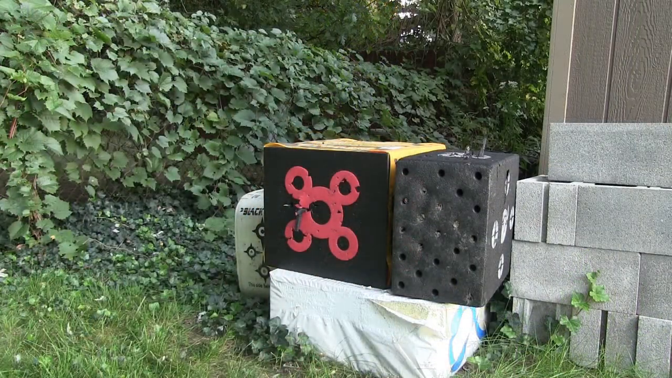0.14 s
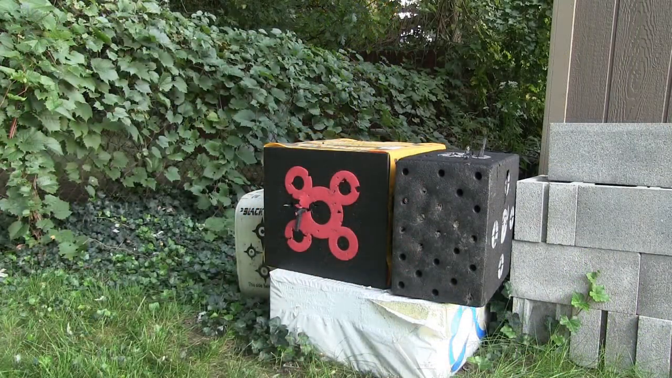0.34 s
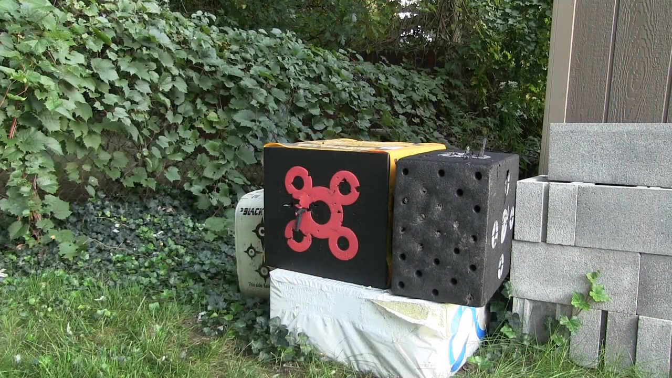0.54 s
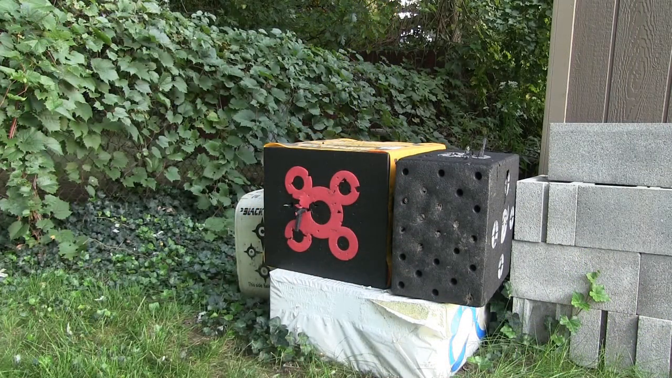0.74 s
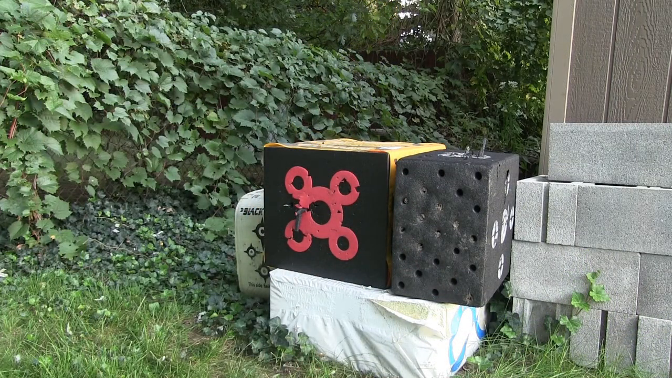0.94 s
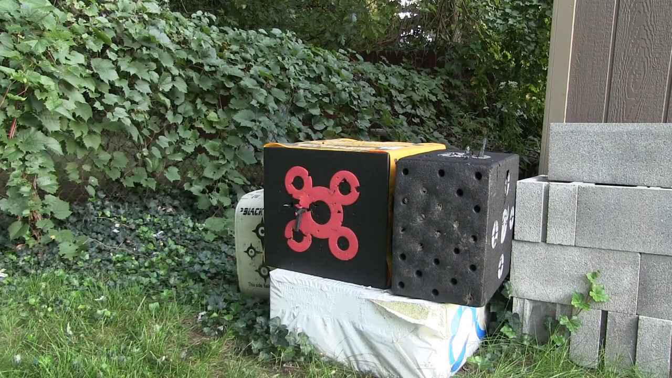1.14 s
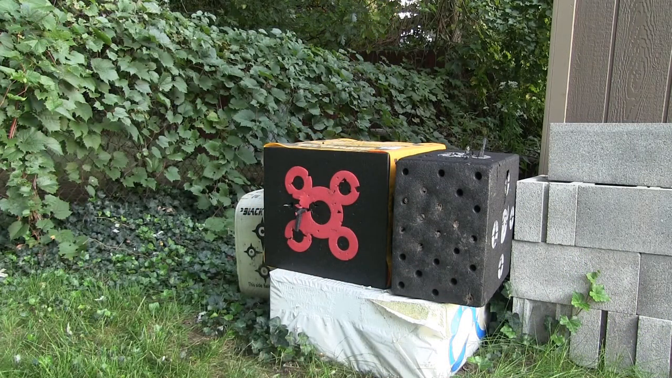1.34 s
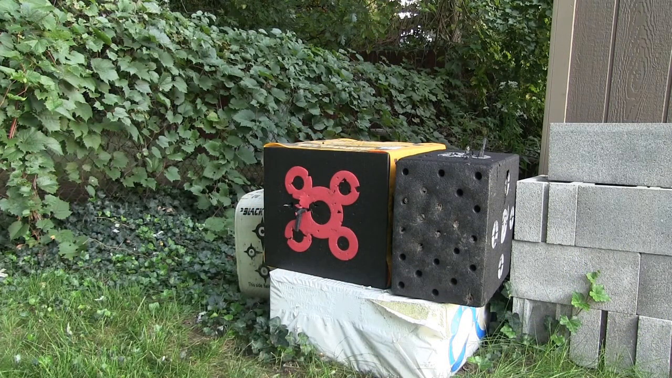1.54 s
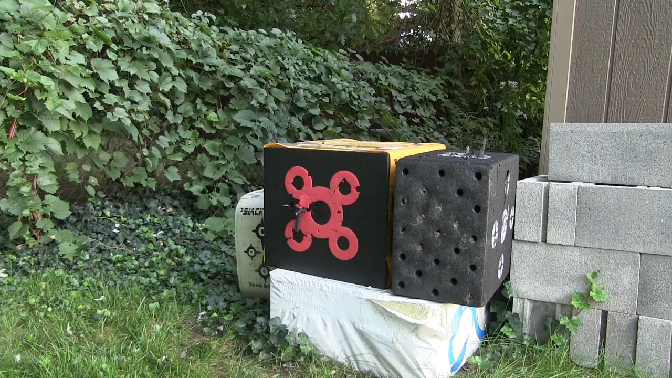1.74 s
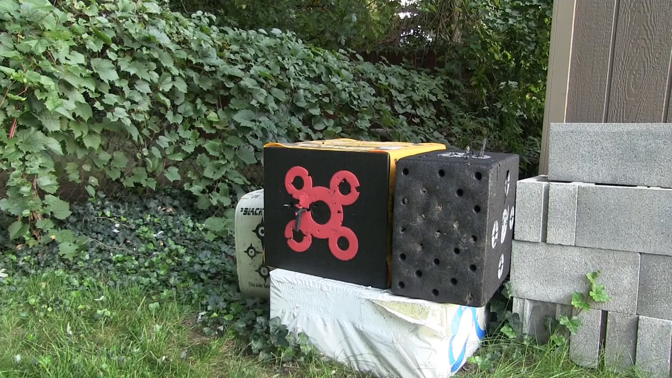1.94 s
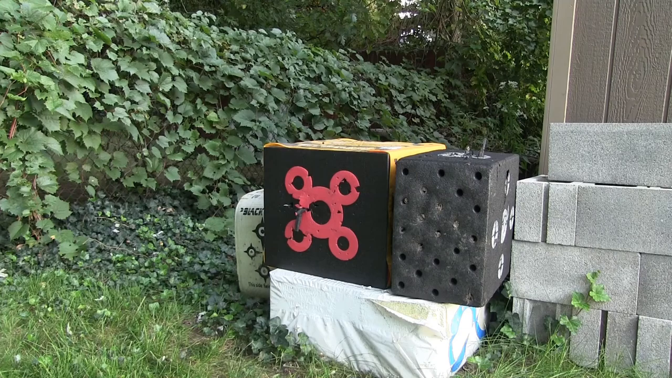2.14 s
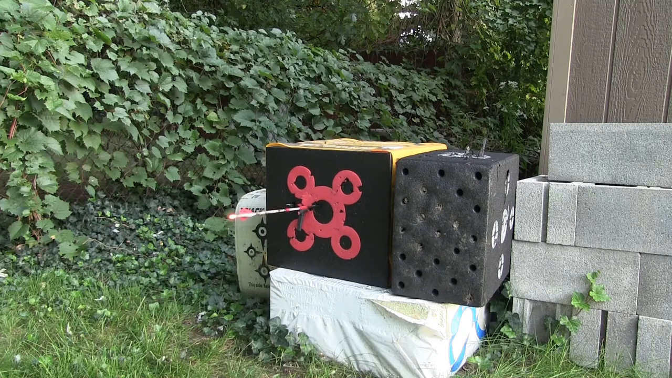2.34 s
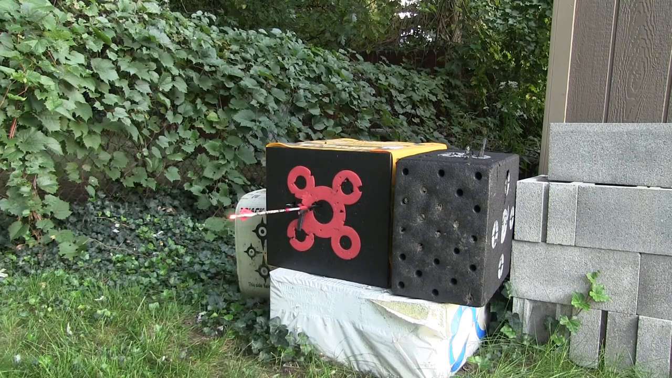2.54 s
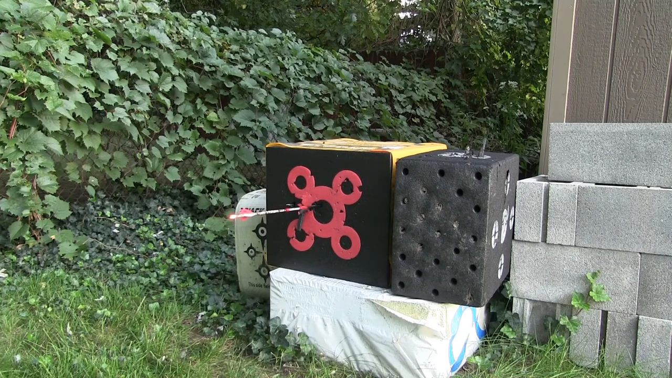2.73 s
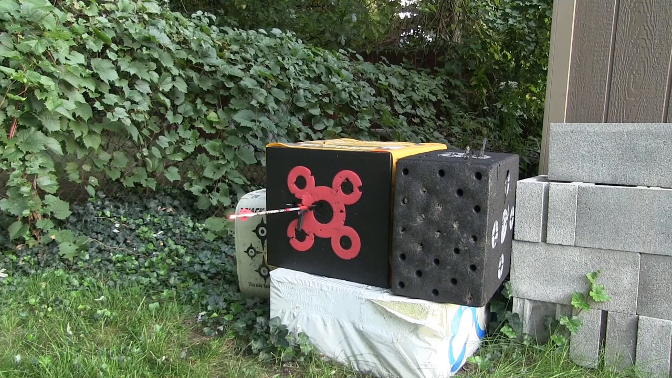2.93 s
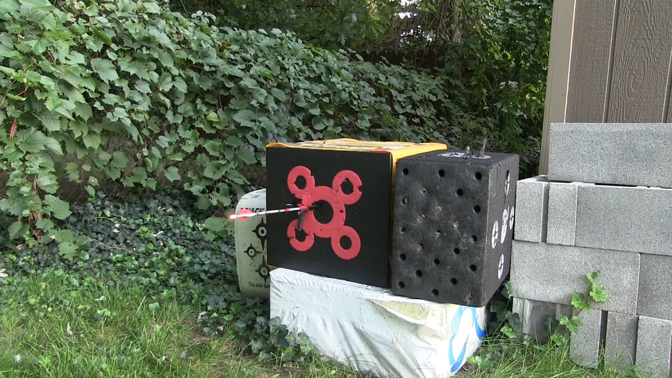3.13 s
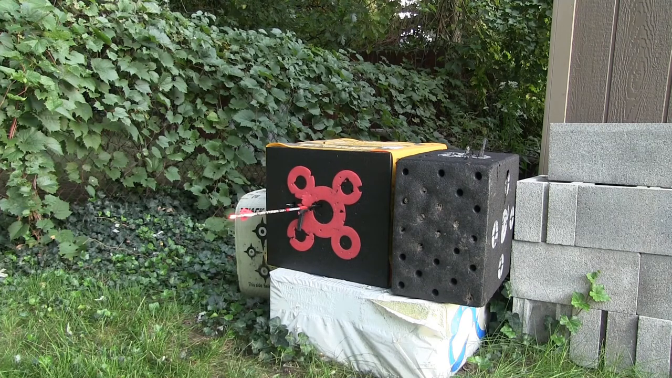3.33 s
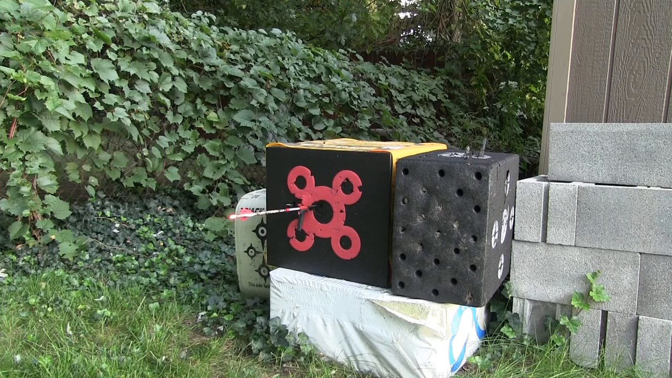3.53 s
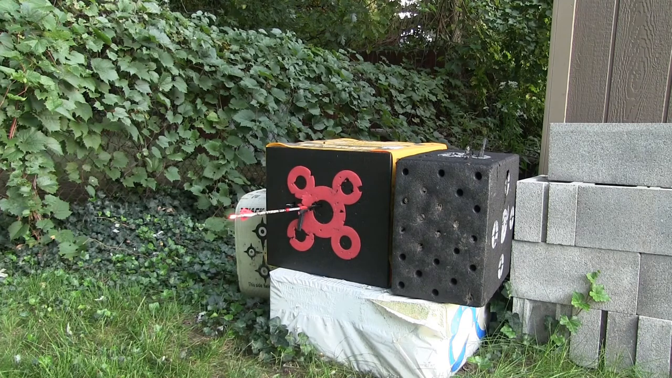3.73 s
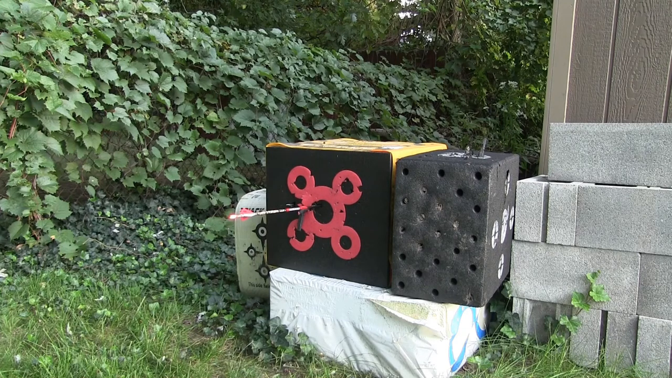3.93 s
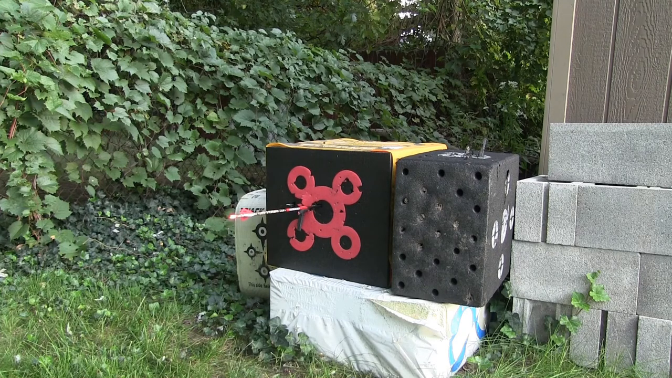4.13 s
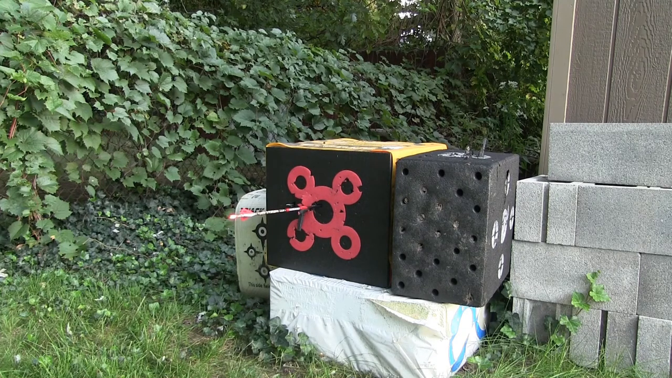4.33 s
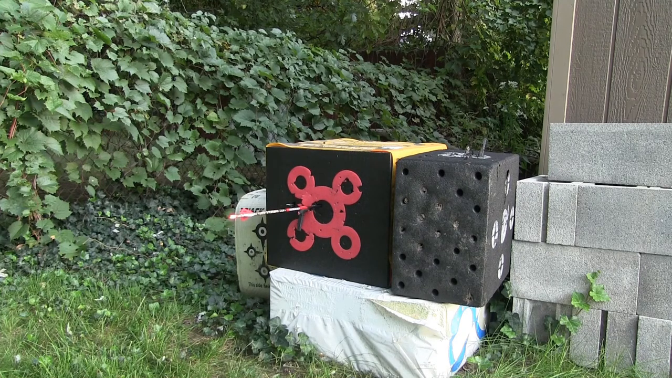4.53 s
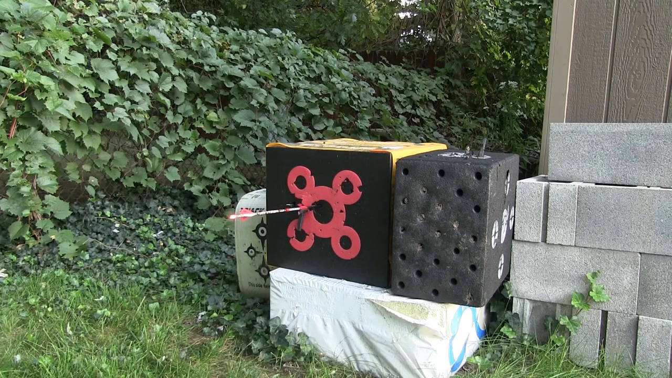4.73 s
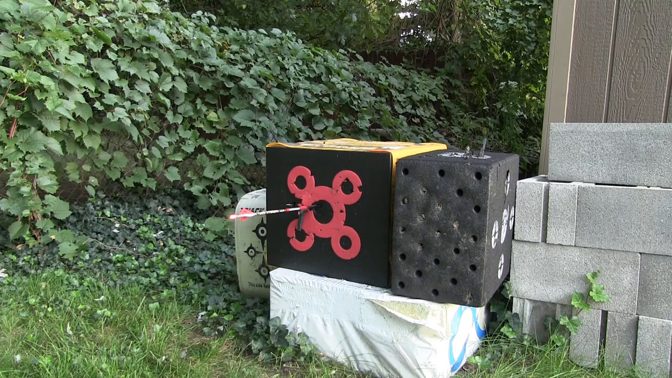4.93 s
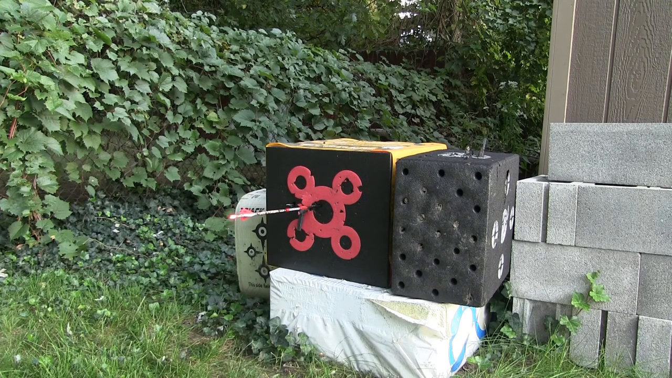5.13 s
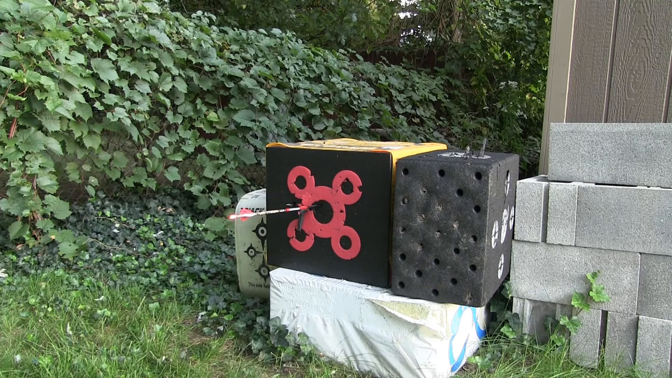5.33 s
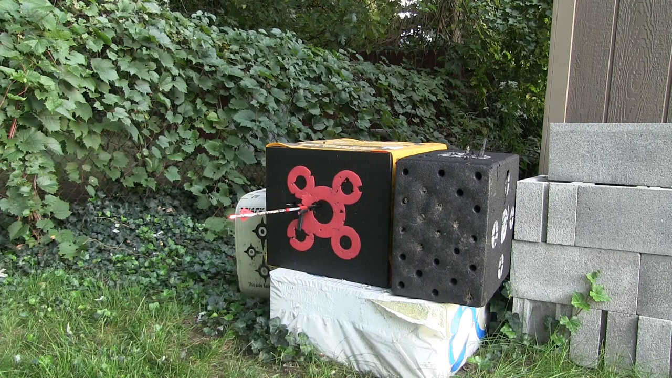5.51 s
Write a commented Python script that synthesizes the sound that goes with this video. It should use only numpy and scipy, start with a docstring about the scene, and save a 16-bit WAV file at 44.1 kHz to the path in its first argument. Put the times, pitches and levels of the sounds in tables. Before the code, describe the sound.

A quiet backyard heard from beside a foam archery target: pulsing crickets, raspy bird chatter and low far traffic. About two seconds in, a bow clacks softly at a distance, its string buzzing; an arrow rushes in and smacks the block with a loud, short, dull thud. Hedge and wall return a brief echo, the background dips and recovers, and insects and bird carry on.

```python
"""Crickets chirp and trill, a bird chatters and far traffic rumbles; then a bow clacks and its string buzzes.
An arrow hisses past and thuds into a foam block close by; hedge, trees and a wall throw the sound back.
The hit pulls the gain down for a moment. A katydid whirrs later.
Arrow, bow and leaves are shaped noise; the block is damped modes plus tearing noise.
Insects are pulsed tones or noise; bird notes are gliding noise bands."""
import sys
import numpy as np
from scipy import signal
from scipy.fft import rfft, irfft
from scipy.io import wavfile

SR = 44100
rng = np.random.default_rng(int(sys.argv[2]) if len(sys.argv) > 2 else 0)


def digitize_waveform(pressure):
    """Quantize a signal to 16-bit integers and store it at the path in sys.argv[1].

    Rows of a 2-D input are taken as channels; values are limited to [-1, 1].
    """
    field = np.atleast_2d(pressure).T
    bounded = np.clip(field, -1, 1)
    quanta = np.round(bounded * 32767).astype(np.int16)
    wavfile.write(sys.argv[1], SR, quanta)


N = 250047
T = np.arange(N) / SR  # [s]

# point pierces, shaft is stopped, block rocks:
# (time [s], mode level [dB], sharpness [Hz], tearing foam level [dB])
BLOWS = [(2.3546, -1, 2190, -4.5), (2.3598, 2, 266, -17.5), (2.3646, -13, 520, -22)]
# modes of the foam block and the shaft in it: (frequency [Hz], relative level [dB], t60 [s])
BLOCK_MODES = [(113, 7, 0.027), (171, -5.5, 0.038), (255, -3.5, 0.03), (466, -2.5, 0.031),
               (823, 2.5, 0.015), (960, -0.5, 0.012), (1240, -3, 0.018), (1580, -10, 0.012),
               (2070, -16, 0.032), (2800, -16.5, 0.022), (2910, -11, 0.023), (3260, -16, 0.015)]
# spectrum of tearing foam: (frequency [Hz], relative density [dB per Hz])
TEAR_SPECTRUM = [(100, -22), (500, -14), (800, -1), (1600, -1), (2300, -7), (3200, 2), (5000, -10),
                 (9000, -14), (13000, -18), (16000, -30)]
# soft hum after the hit
HUM_HZ, HUM_WIDTH_HZ, HUM_RISE_S, HUM_DB, HUM_T60_S = 302, 94, 0.027, -35, 0.42

# closest approach, speed and miss distance of the arrow
PASS_S, ARROW_M_PER_S, MISS_M = 2.3432, 59, 0.27
RUSH_COMING_HZ, RUSH_GOING_HZ = 2235, 5010
RUSH_DB, HISS_DB = -15.5, -21.5  # sideways, at the miss distance
RUSH_AHEAD_DB, HISS_AHEAD_DB = -9.5, -6.5  # added straight ahead: less sound is thrown forward
# air rush of the arrow: (frequency [Hz], relative density [dB per Hz])
RUSH_SPECTRUM = [(60, -30), (500, -32), (1100, -17), (1700, -2), (2600, -4.5), (4400, -3.5), (7000, -10),
                 (9000, -16), (15500, -23)]
# thin hiss of the vanes' edges: (frequency [Hz], relative density [dB per Hz])
HISS_SPECTRUM = [(4000, -30), (8000, -10), (10000, -8), (12500, -1), (15500, 0)]

# string let go, limbs slam home: (time [s], level [dB])
CLACKS = [(2.029, -32.5), (2.041, -24.5), (2.046, -23.5), (2.053, -31)]
CLACK_T60_S, BUZZ_DB, BUZZ_RISE_S, BUZZ_T60_S = 0.062, -36.5, 0.0068, 0.76
# spectrum of bow and string: (frequency [Hz], relative density [dB per Hz])
BOW_SPECTRUM = [(410, -43), (700, -14), (1730, -5), (1950, -13), (2190, -3), (3230, -9), (3970, -6),
                (5360, -15), (5790, -13.5), (12300, -31), (15500, -41)]

# near hedge and far trees: (delay [s], rise [s], relative level [dB], t60 [s])
SCATTERERS = [(0, 0.0013, 21, 0.2), (0.089, 0.026, 11.5, 0.75)]
# spectrum of the yard's echo: (frequency [Hz], relative level [dB])
YARD_SPECTRUM = [(60, 0), (200, 3), (300, -3.5), (450, -15), (700, -6.5), (1500, 6), (3000, -0.5),
                 (4400, 9.5), (5800, -7), (8500, 7), (12000, -8), (16000, -9)]
YARD_S, WALL_S = 0.7, 0.184  # length of the echo tail, delay of the wall slap

# near cricket: (first stroke [s], strokes [count], level of first stroke [dB])
CHIRPS = [(-.001, 2, -30.5), (.529, 2, -30.5), (1.043, 2, -29.5), (1.611, 2, -30.5), (2.113, 2, -31),
          (3.325, 2, -47.5), (4.117, 2, -44.5), (4.366, 2, -34), (5.095, 3, -34.5)]
STROKE_GAP_S, STROKE_GROWTH_DB = 0.0458, 1
STROKE_TOP_HZ, STROKE_SAG_HZ, STROKE_SAG_S = 4950, 350, 0.0029  # pitch drops as the wing slows
# scraper grazes the file, bites, lets go
GRAZE_S, GRAZE_DB, BITE_S, RELEASE_S = 0.016, -7, 0.0024, 0.0038

# bird phrases of evenly spaced notes: (first note [s], last note [s], notes [count], level [dB])
PHRASES = [(.01, .155, 3, -37.5), (.222, .527, 6, -38), (.648, .69, 2, -44), (1.062, 1.062, 1, -41),
           (1.755, 1.755, 1, -41), (2.193, 2.29, 3, -37.5), (2.491, 2.551, 2, -33.5),
           (2.582, 2.665, 4, -38.5), (3.116, 3.38, 7, -36), (4.208, 4.325, 4, -42), (4.875, 5.2, 8, -45.5)]
PHRASE_MIDDLE_DB, PHRASE_ENDS_EXTRA_DB = -1, -2  # both added to the phrase level
# steady peeps of the bird: (start [s], length [s], pitch [Hz], level [dB])
PEEPS = [(3.416, 0.02, 2350, -45), (3.463, 0.034, 2373, -41)]

# farther crickets: (start [s], length [s], nominal pitch [Hz], level [dB], warm-up [s])
TRILLS = [(0.229, 0.19, 5335, -43.5, .004), (.26, 0.14, 5100, -54, .01), (0.94, .19, 5300, -55.5, 0.0042),
          (1.289, .19, 5520, -59, .004), (1.485, 0.19, 5345, -46, .004), (1.552, 0.17, 4930, -42.5, 0.021),
          (2.647, 0.21, 5326, -45.5, 0.0075), (2.916, 0.236, 4997, -44.5, 0.054),
          (3.13, .215, 5310, -56, .004), (3.852, .183, 5330, -44.5, 0.0041),
          (4.126, 0.22, 5320, -59, 0.0045), (4.206, 0.16, 4960, -46.5, 0.021),
          (4.862, .19, 5340, -48.5, 0.0094), (5.454, 0.29, 5020, -46.5, 0.05)]
TRILL_STROKES_PER_S = 54
# farthest trills, placed at random
CHORUS_GAP_S, CHORUS_LENGTH_S, CHORUS_WARM_S = 0.49, 0.19, 0.0154
CHORUS_LOW_HZ, CHORUS_HIGH_HZ, CHORUS_DB = 4950, 5380, -61

# katydid; level is that reached at the stop
WHIRR_START_S, WHIRR_STOP_S, WHIRR_DB, WHIRR_SWELL_DB_PER_S = 3.9, 5.02, -61, 12

# dry ticks in the leaves: (time [s], level [dB], frequency [Hz], t60 [s])
TICKS = [(2.6697, -23.5, 5900, 0.006)]
# stirring leaves: (start [s], length [s], level [dB])
STIRS = [(0.773, 0.087, -49), (1.29, 0.064, -68), (4.797, 0.12, -49)]
# spectrum of stirring leaves: (frequency [Hz], relative density [dB per Hz])
LEAF_SPECTRUM = [(500, -33), (1500, 10), (4000, 2), (8000, -15), (13000, -13), (16000, -24)]

# spectrum of far traffic and leaves: (frequency [Hz], relative density [dB per Hz])
AIR_SPECTRUM = [(12, -41), (20, 7.5), (37, 0), (112, 0.5), (306, -16), (491, -16.5), (631, -19),
                (958, -17.5), (1500, -21), (2090, -22), (3000, -22), (4950, -29.5), (6720, -34),
                (12400, -44.5), (15500, -50.5)]
AIR_DB = -38  # before the traffic gains
# far car fading away, only the change about each mean counts:
# (time [s], engine rumble level [dB], tyre wash level [dB])
TRAFFIC = [(0.0, -38.5, -42.5), (0.54, -37.5, -43), (1.69, -40, -44), (2.04, -39.5, -44.5),
           (3.81, -39.5, -45.5), (4.45, -41, -49), (5.67, -41, -49.5)]
# steady bands of engines, tyres and far cricket chorus, before the traffic gains:
# (centre [Hz], width [Hz], level [dB], extra share of the tyre wash's swell [ratio])
DRONES = [(55.5, 16, -45, 0.13), (117.9, 19, -51.5, 0.021), (166.4, 19.4, -52.5, 0.49),
          (879, 550, -56, 2.7), (4670, 1000, -58, 0.21)]

EDGE_HZ = 16000  # upper band limit


def target(tear_t60_s=0.0163, give_cycles=0.39, spread_octaves=1.32, muffle_hz=6000):
    """Each blow rings the damped modes near its sharpness; foam tears as the shaft slides, then dies away."""
    out, t = np.zeros(N), np.arange(SR // 6) / SR
    slide_s = 0.0018
    after_slide_s = np.maximum(t - slide_s, 0)
    slide = np.minimum(t / slide_s, 1) ** 0.5 * amp(-60 * after_slide_s / tear_t60_s)
    slide_rms = np.sqrt(np.mean(slide ** 2))
    for k, (s, db, sharp_hz, tear_db) in enumerate(BLOWS):
        direction = -(-1) ** k  # face is driven in, springs out, falls back
        for hz, mode_db, t60_s in BLOCK_MODES:
            reach = np.exp(-0.5 * (np.log2(hz / sharp_hz) / spread_octaves) ** 2)
            onset = 1 - np.exp(-t * hz / give_cycles)  # soft foam: low modes build up late
            decay = amp(db + mode_db - 60 * t / t60_s)
            add(out, s, direction * decay * reach * onset * np.sin(2 * np.pi * hz * t))
        tear = amp(tear_db) * slide_rms * unit(colour(even_noise(slide), TEAR_SPECTRUM))
        tear *= t < t[-1] / 2
        if k > 0:  # once the point is buried, foam muffles it
            tear = signal.sosfilt(signal.butter(2, muffle_hz, fs=SR, output="sos"), tear)
        add(out, s, tear)
    return out


def low_ring():
    """A soft narrow-band hum that dies away after the thud."""
    return burst(BLOWS[-1][0], HUM_RISE_S, HUM_DB, HUM_T60_S) * band(HUM_HZ, HUM_WIDTH_HZ)


def arrow(flutter_hz=340, focus=0.72, width_hz=3600, beam=4, entry_s=0.0054):
    """Air tears off fluttering vanes; the rush swells with nearness and brightens as the arrow goes by."""
    to_go_m = ARROW_M_PER_S * (PASS_S - T)
    distance_m = np.hypot(to_go_m, MISS_M)
    facing = to_go_m / distance_m  # 1 coming, -1 going
    ahead = np.maximum(facing, 0) ** beam
    centre_hz = np.interp(facing, [-0.5, 0.5], [RUSH_GOING_HZ, RUSH_COMING_HZ])
    rush = unit(noise(RUSH_SPECTRUM) + focus * band(centre_hz, width_hz))
    rush *= amp(RUSH_DB + RUSH_AHEAD_DB * ahead)
    hiss = amp(HISS_DB + HISS_AHEAD_DB * ahead) * noise(HISS_SPECTRUM)
    vanes = 1 + 0.25 * np.sin(2 * np.pi * flutter_hz * (T - PASS_S))
    nearness = MISS_M / distance_m
    flight = during(CLACKS[-1][0], BLOWS[0][0], entry_s)
    return (rush + hiss) * vanes * nearness * flight


def bow(clack_rise_s=0.0005):
    """String and limbs clatter briefly, then the string buzzes; powers of the envelopes add."""
    clack_power = sum(burst(s, clack_rise_s, db, CLACK_T60_S) ** 2 for s, db in CLACKS)
    buzz_power = burst(CLACKS[0][0], BUZZ_RISE_S, BUZZ_DB, BUZZ_T60_S) ** 2
    return np.sqrt(clack_power + buzz_power) * noise(BOW_SPECTRUM)


def yard(x):
    """Hedge and trees scatter sound back as a decaying tail of coloured noise."""
    level = np.sqrt(sum(burst(*row) ** 2 for row in SCATTERERS))
    tail = (noise(YARD_SPECTRUM) * level)[:round(YARD_S * SR)]
    return signal.fftconvolve(x, tail / np.linalg.norm(tail))[:N]


def wall(x, echo_db=-23, low_hz=1000, high_hz=4400):
    """One band-limited slap comes back from a house wall."""
    out = np.zeros(N)
    reflection = signal.butter(3, [low_hz, high_hz], "bandpass", fs=SR, output="sos")
    add(out, WALL_S, amp(echo_db) * signal.sosfilt(reflection, x))
    return out


def near_cricket(octave_db=-24, flutter_db=1):
    """Each stroke drags a scraper over the wing's file: a falling tone with a faint octave."""
    jitter = 0.005
    out, t = np.zeros(N), np.arange(-SR // 40, SR // 40) / SR
    hz = STROKE_TOP_HZ - STROKE_SAG_HZ / (1 + np.exp(-t / STROKE_SAG_S))
    graze = amp(GRAZE_DB) * np.exp(-np.square(2 * t / GRAZE_S + 1) ** 2)
    bite = np.exp(-0.5 * (t / np.where(t < 0, BITE_S, RELEASE_S)) ** 2)
    for start, count, db in CHIRPS:
        for k in range(round(count)):
            phase = 2 * np.pi * np.cumsum(hz * (1 + jitter * wander(660, len(t)))) / SR
            stroke_db = db + k * STROKE_GROWTH_DB + flutter_db * wander(430, len(t))
            level = (graze + bite) * amp(stroke_db)
            tone = np.sin(phase) + amp(octave_db) * np.sin(2 * phase)
            add(out, start + k * STROKE_GAP_S + t[0], np.sqrt(2) * level * tone)
    return out


def bird(centre_hz=2740, rasp_hz=420, half_db=-15, upper_db=-20, scatter_t60_s=0.17):
    """Raspy upward flicks with weaker partials below and above, and clean peeps."""
    rise_hz_per_s, sigma_s, scatter_db = 46000, 0.0062, -8
    out, t = np.zeros(N), np.arange(-SR // 50, SR // 50) / SR
    hz = centre_hz + rise_hz_per_s * t
    swell = np.exp(-0.5 * (t / sigma_s) ** 2)
    for s, db in notes():
        note = band(hz, rasp_hz, len(t))
        note += amp(half_db) * band(hz / 2, rasp_hz, len(t))
        note += amp(upper_db) * band(hz * 1.5, rasp_hz * 2, len(t))
        note = amp(db) * unit(note * swell) * np.sqrt(np.mean(swell ** 2))
        add(out, s + t[0], foliage(note, scatter_db, scatter_t60_s))
    for s, length_s, pitch_hz, db in PEEPS:
        t = np.arange(0, length_s, 1 / SR)
        peep = np.sqrt(2) * np.sin(2 * np.pi * pitch_hz * t)
        add(out, s, amp(db) * peep * signal.windows.tukey(len(t), 0.6))
    return out


def notes():
    """Time and level of every note; a phrase is loudest in its middle."""
    rows = []
    for first, last, count, db in PHRASES:
        for u in np.linspace(0, 1, round(count)):
            note_db = db + PHRASE_MIDDLE_DB + PHRASE_ENDS_EXTRA_DB * (2 * u - 1) ** 2
            rows.append((first + u * (last - first), note_db))
    return rows


def far_crickets(flat_start=0.077, jitter=0.0083, pulse_shape=0.7, uneven_db=0.8,
                 scatter_db=-7, scatter_t60_s=0.43):
    """Trains of quick wing strokes climb to their pitch and strength, blurred by foliage."""
    out = np.zeros(N)
    for start, length_s, hz, db, warm_s in TRILLS + chorus():
        t = np.arange(0, length_s, 1 / SR)
        cycle = t * TRILL_STROKES_PER_S % 1
        cold = np.exp(-t / warm_s)
        sag = 0.01 * (cycle - 0.5)  # pitch falls within each stroke
        pitch_hz = hz * (1 - sag - flat_start * cold + jitter * wander(251.4, len(t)))
        strokes = (1 - cold) * np.abs(np.sin(np.pi * cycle)) ** pulse_shape
        strokes *= amp(uneven_db * wander(38, len(t)))
        trill = unit(strokes * np.sin(2 * np.pi * np.cumsum(pitch_hz) / SR))
        trill *= amp(db) * signal.windows.tukey(len(t), 0.12)
        add(out, start, foliage(trill, scatter_db, scatter_t60_s))
    return out


def chorus(count=13):
    """Faint trills at loose intervals and random pitches, as rows like those of TRILLS."""
    rows = []
    for k, (when, pitch) in enumerate(rng.random((count, 2))):
        hz = CHORUS_LOW_HZ + pitch * (CHORUS_HIGH_HZ - CHORUS_LOW_HZ)
        rows.append(((k + when) * CHORUS_GAP_S, CHORUS_LENGTH_S, hz, CHORUS_DB, CHORUS_WARM_S))
    return rows


def foliage(x, db, t60_s):
    """Leaves around a caller smear its sound: direct path plus a decaying noise tail."""
    tail = rng.standard_normal(SR // 4) * amp(-60 * T[:SR // 4] / t60_s)
    tail *= amp(db) / np.linalg.norm(tail)
    tail[0] = 1  # direct path
    return signal.fftconvolve(x, tail)


def katydid(pulses_per_s=24.9, centre_hz=14700, width_hz=3400, depth=0.6, whistle_hz=15400, whistle=0.6):
    """Thin, very high noise around a whistling resonance, pulsed by the wings; swells, then stops."""
    rasp = unit(band(centre_hz, width_hz) + whistle * band(whistle_hz, 600))
    level = amp(WHIRR_DB + WHIRR_SWELL_DB_PER_S * (T - WHIRR_STOP_S))
    level *= during(WHIRR_START_S, WHIRR_STOP_S, 0.015)
    return level * rasp * unit(1 + depth * np.sin(2 * np.pi * pulses_per_s * T))


def ticks(width_hz=9000):
    """Tiny dry snaps: decaying wide-band noise."""
    out, t = np.zeros(N), np.arange(SR // 50) / SR
    for s, db, hz, t60_s in TICKS:
        add(out, s, amp(db - 60 * t / t60_s) * band(hz, width_hz, len(t)))
    return out


def leaves(grain_db=3):
    """Short, faint rustles of noise with a grainy level."""
    level = sum(amp(db) * np.exp(-(2 * (T - s) / length_s - 1) ** 2) for s, length_s, db in STIRS)
    return level * unit(noise(LEAF_SPECTRUM) * amp(grain_db * wander(600)))


def background(split_hz=230, leaves_hz=2600, leaves_share=0.51, rumble_gain_db=0.2, wash_gain_db=1.37,
               wash_share=0.68):
    """Noise in three bands: rumble and tyre wash follow the traffic, the hiss of leaves less so."""
    engine_db, tyres_db = (db - db.mean() for db in curves(TRAFFIC, T))
    rumble_db = rumble_gain_db + engine_db
    wash_db = wash_gain_db + wash_share * tyres_db
    air = amp(AIR_DB) * noise(AIR_SPECTRUM)
    for hz, width_hz, db, extra_share in DRONES:
        air += amp(db + extra_share * wash_db) * band(hz, width_hz)
    low = signal.sosfiltfilt(signal.butter(2, split_hz, fs=SR, output="sos"), air)
    low_and_mid = signal.sosfiltfilt(signal.butter(2, leaves_hz, fs=SR, output="sos"), air)
    rumble = low * amp(rumble_db)
    wash = (low_and_mid - low) * amp(wash_db)
    leaf_hiss = (air - low_and_mid) * amp(leaves_share * wash_db)
    return rumble + wash + leaf_hiss


def amp(db):
    """Decibels to gain."""
    return 10 ** (np.asarray(db) / 20)


def unit(x):
    """Scales to an rms of one."""
    return x / np.sqrt(np.mean(x ** 2) + 1e-20)


def curves(rows, t):
    """Every column of a table after the first, joined by straight lines."""
    s, *columns = np.transpose(rows)
    return [np.interp(t, s, c) for c in columns]


def during(start, end, edge_s):
    """One between two times, with sloping edges, else zero."""
    return np.clip(np.minimum(T - start, end - T) / edge_s, 0, 1)


def burst(start, rise_s, db, t60_s):
    """Envelope that rises quickly and dies away."""
    age_s = np.maximum(T - start, 0)
    return (1 - np.exp(-age_s / rise_s)) * amp(db - 60 * age_s / t60_s)


def add(mix, s, sound):
    """Lays a sound into the mix at a time, cropped to the mix."""
    at = round(s * SR)
    sound = sound[max(-at, 0):]
    part = mix[max(at, 0):][:len(sound)]
    part += sound[:len(part)]


def colour(x, points):
    """Filters by a spectrum joined on a log-frequency axis."""
    hz, db = np.transpose(points)
    f = np.fft.rfftfreq(len(x), 1 / SR)
    gain = amp(np.interp(np.log(f + 1), np.log(hz + 1), db))
    return irfft(rfft(x) * gain, len(x))


def noise(points):
    """Unit noise with a given spectrum."""
    return unit(colour(rng.standard_normal(N), points))


def even_noise(envelope):
    """A noise burst under an envelope, its spectrum evened by repeatedly keeping only the phase."""
    x = envelope * rng.standard_normal(len(envelope))
    for _ in range(6):
        flat = irfft(np.exp(1j * np.angle(rfft(x))), len(x))
        x = flat * (envelope / envelope.max()) ** 0.5
    return x * np.linalg.norm(envelope) / np.linalg.norm(x)


def band(hz, width_hz, size=N):
    """Unit noise in a steep resonance that may glide: low-passed complex noise shifted up to hz."""
    r = np.exp(-np.pi * abs(width_hz) / SR)
    lead_in = 4000  # samples for the filter to settle
    z = rng.standard_normal(size + lead_in) + 1j * rng.standard_normal(size + lead_in)
    for _ in range(3):
        z = signal.lfilter([1 - r], [1, -r], z)
    carrier = np.exp(2j * np.pi * np.cumsum(hz * np.ones(size)) / SR)
    return unit((z[-size:] * carrier).real)


def wander(rate_hz, size=N):
    """Random drift: straight lines between unit-variance knots."""
    knots = rng.standard_normal(4096)
    return np.interp(np.arange(size) / SR * rate_hz, np.arange(len(knots)), knots)


def scene(shot_echo_db=-18, animal_echo_db=-14, bird_echo_db=-6):
    """The shot and the animals share the yard's echo; only the shot reaches the wall."""
    shot = bow() + arrow() + target()
    chatter = bird()
    insects = near_cricket() + far_crickets() + katydid()
    to_yard = amp(shot_echo_db) * shot + amp(animal_echo_db) * insects + amp(bird_echo_db) * chatter
    echoes = yard(to_yard) + wall(shot)
    return (shot + insects + chatter + low_ring() + ticks() + leaves() + echoes + background())[None]


def record(dry, threshold_db=-15, squeeze=1.0, recover_db_per_s=55, attack_s=0.029, low_cut_hz=34):
    """Low cut; loud sound pulls the gain down and it recovers steadily; soft clip; upper band limit."""
    dry = signal.sosfilt(signal.butter(2, low_cut_hz, "highpass", fs=SR, output="sos"), dry)
    r = np.exp(-1 / (attack_s * SR))
    power_db = 10 * np.log10(signal.lfilter([1 - r], [1, -r], dry[0] ** 2) + 1e-12)
    fall_db = T * recover_db_per_s
    held_db = np.maximum.accumulate(power_db + fall_db) - fall_db  # peak hold with a steady fall
    over_db = np.maximum(held_db - threshold_db, 0)
    ducked = dry * amp(-squeeze * over_db)
    clipped = ducked / (1 + (ducked / 0.74) ** 6) ** (1 / 6)
    band_limit = signal.firwin(701, EDGE_HZ, window=("kaiser", 9), fs=SR)
    return signal.oaconvolve(clipped, band_limit[None], "same")


dry = scene()
out = record(dry)
digitize_waveform(out)
```